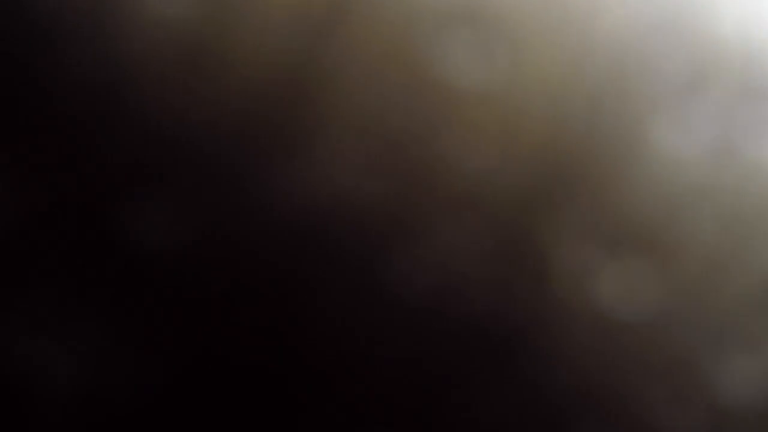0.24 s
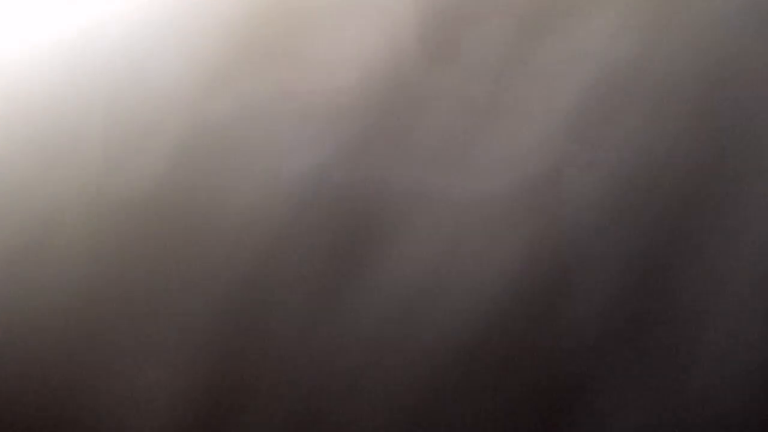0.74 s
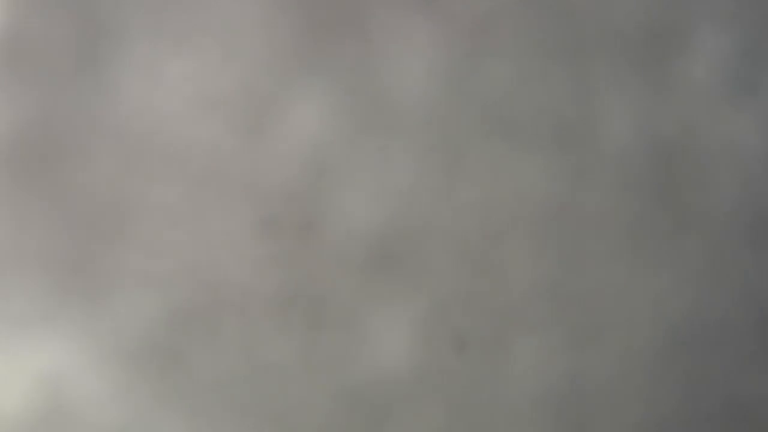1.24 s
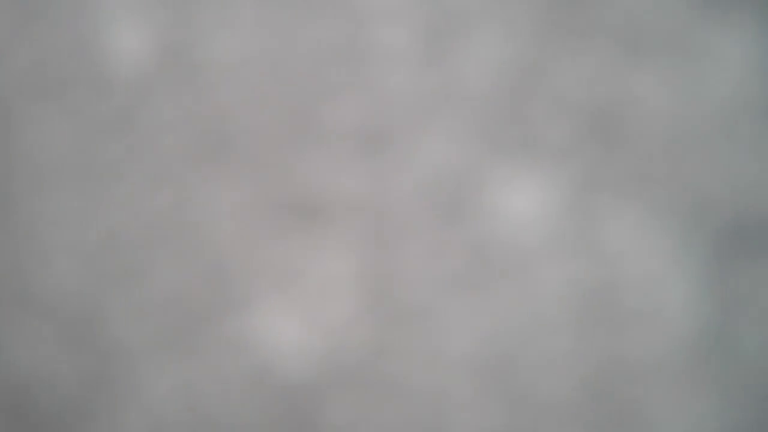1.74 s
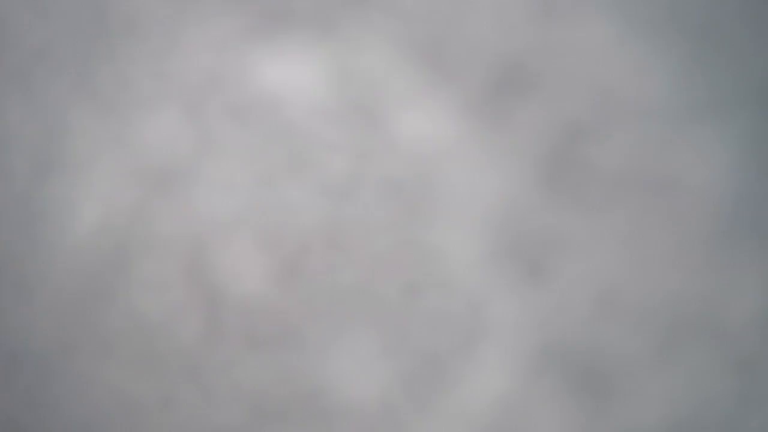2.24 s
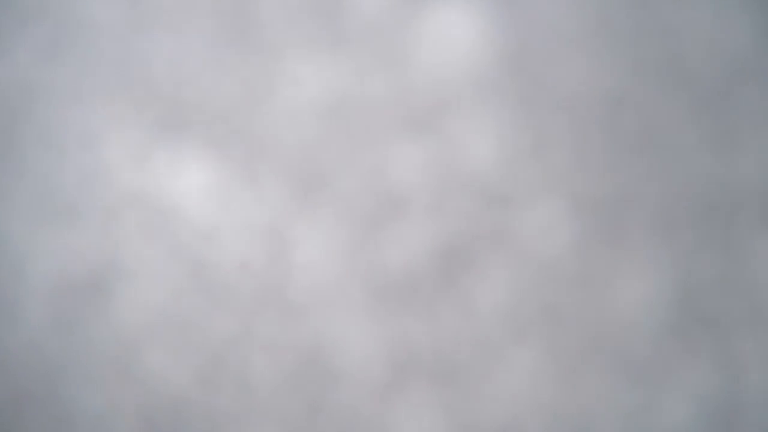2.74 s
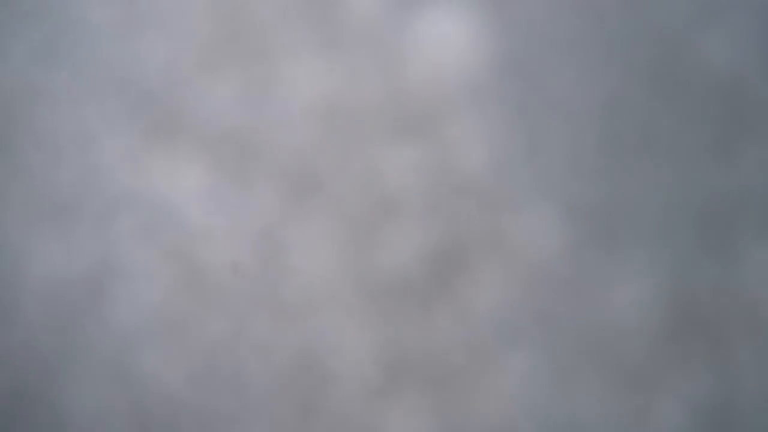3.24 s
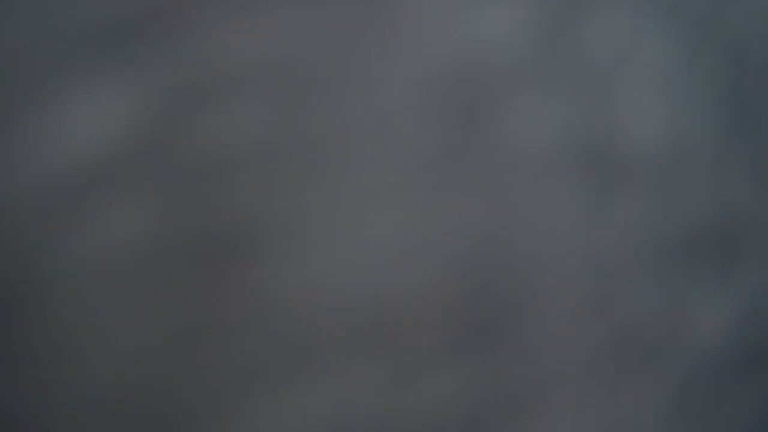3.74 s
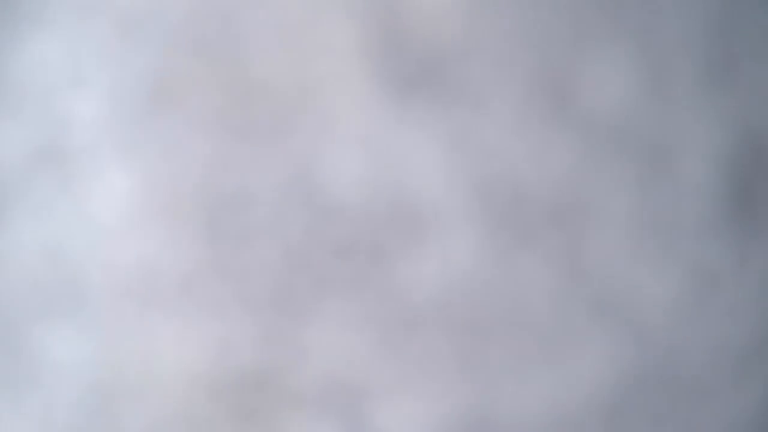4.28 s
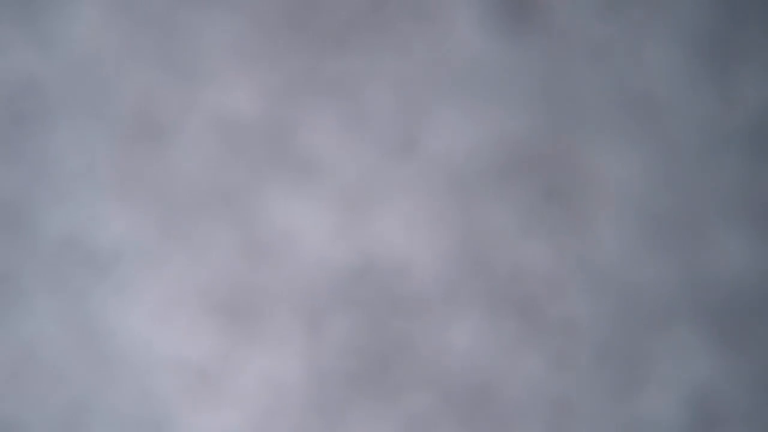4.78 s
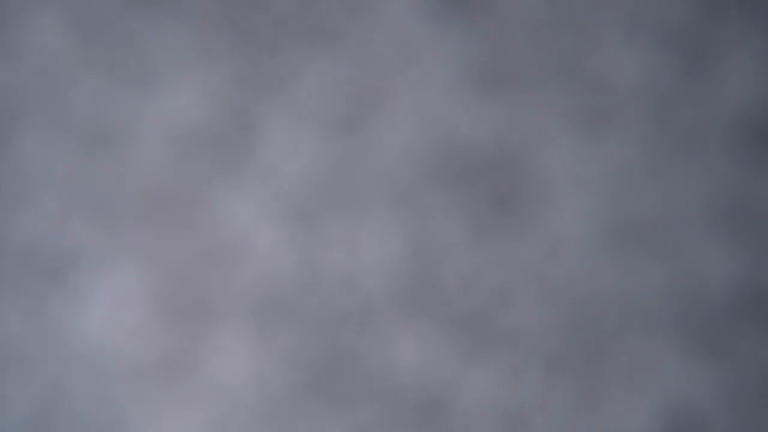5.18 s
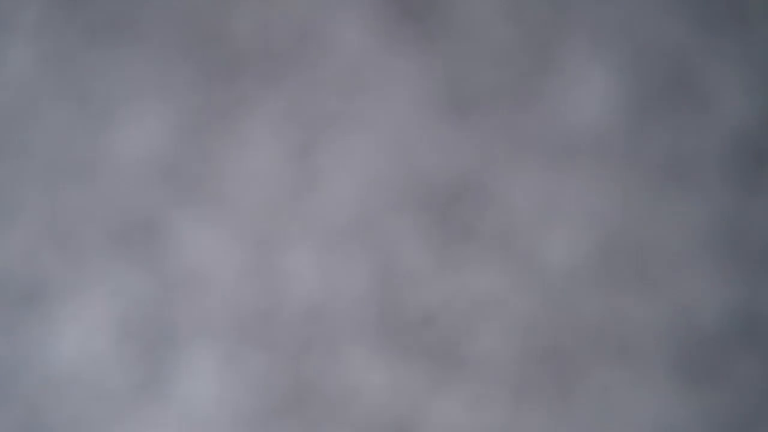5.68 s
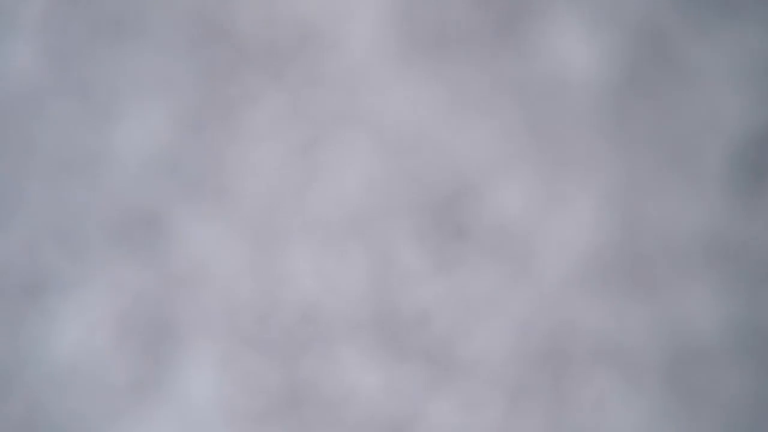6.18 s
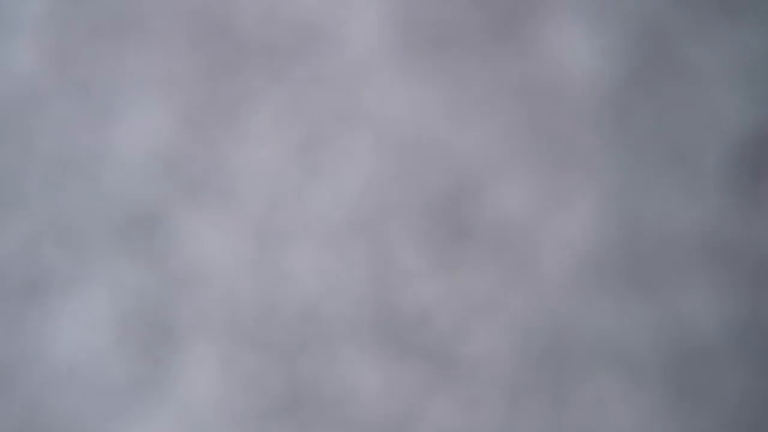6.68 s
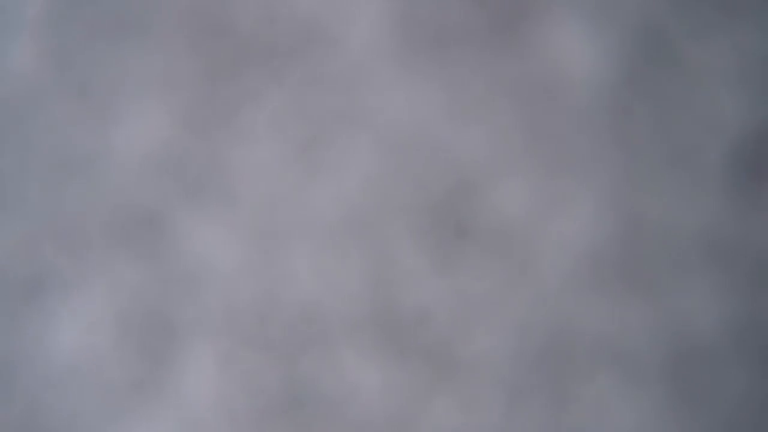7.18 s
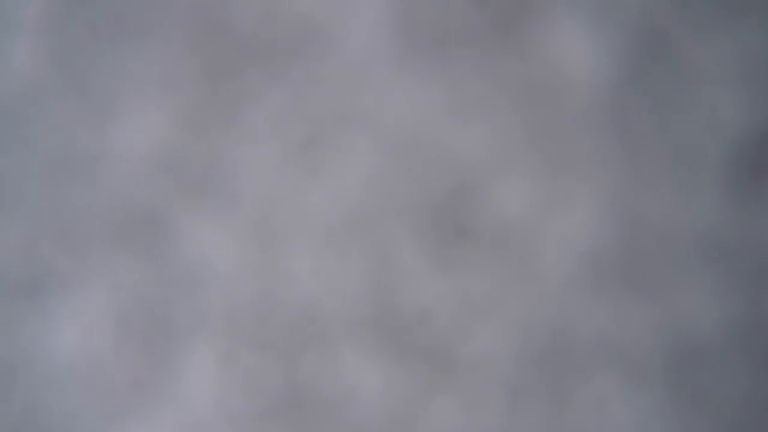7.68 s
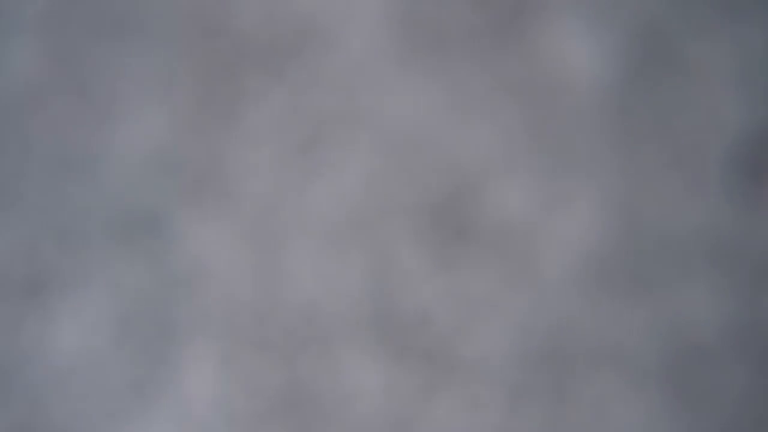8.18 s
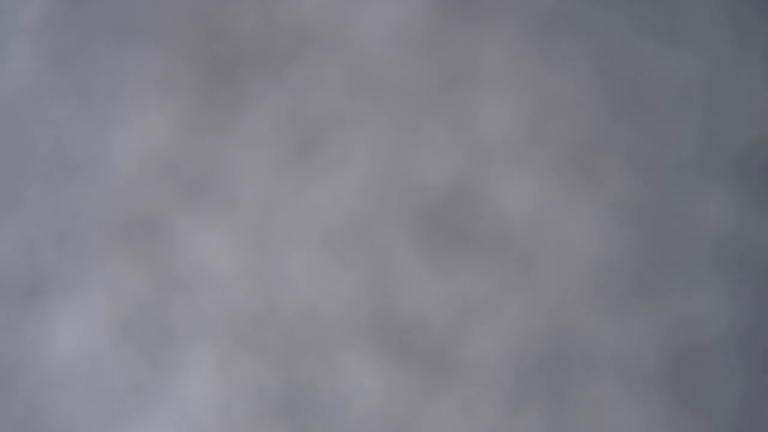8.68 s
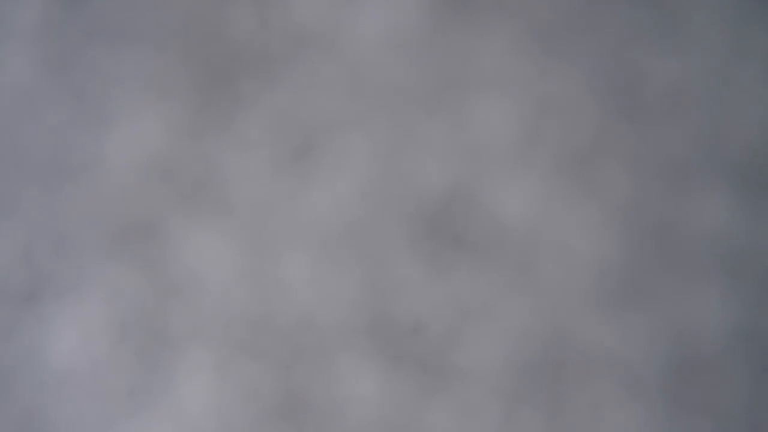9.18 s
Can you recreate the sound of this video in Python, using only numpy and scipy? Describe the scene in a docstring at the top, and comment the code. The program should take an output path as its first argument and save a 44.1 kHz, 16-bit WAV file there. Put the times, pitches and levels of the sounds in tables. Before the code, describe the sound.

Close, harsh rustling of an animal's coat against a camera case, bursts of crackle and muffled bumps, hard knocks mid-way, quieter toward the end.

```python
"""Fur rubbing on a small camera

An animal's fur rests on a small outdoor camera, right on its microphone port, and rubs over it
stroke by stroke. Countless hairs flick the housing, as random clicks and noise that merge into a hiss.
The pushing body pumps air into the port and bumps the case: slow filtered noise and damped swings.
Stiff hairs and grit tick and something hard knocks, as short rings with bursts of noise.
A low hum, a gliding sine, passes once over a faint hiss, and the loudest moments overload the input."""
import sys
import numpy as np
from scipy.fft import rfft, irfft, next_fast_len
from scipy.io import wavfile
from scipy.ndimage import uniform_filter1d, map_coordinates

SR = 44100
rng = np.random.default_rng(int(sys.argv[2]) if len(sys.argv) > 2 else 0)


def waveform_to_disk(signal):
    """Save audio, clipped to [-1, 1], as 16-bit WAV at the path in sys.argv[1]."""
    frames = np.transpose(np.atleast_2d(signal))
    scaled = np.clip(frames, -1, 1) * 32767
    samples = np.round(scaled).astype(np.int16)
    wavfile.write(sys.argv[1], SR, samples)


N = 415422  # length in samples

# Colour of the faint steady hiss. Each row: frequency in Hz, relative level in dB per Hz.
HISS_COLOUR = [(30, 6.5), (150, 3), (600, 6), (2500, 2), (7000, -2), (15000, -7)]
# A low hum that sinks and fades. Each row: time in seconds, centre pitch in Hz, level in dB.
HUM_PATH = [(6.36, 102.9, -60), (6.42, 101, -35), (6.53, 96.5, -37.5), (6.62, 86.5, -34.5),
            (6.70, 86.3, -38), (6.76, 82, -70)]
# Ticks of stiff hairs and grit. Each row: start in seconds, level in dB, ring pitch in Hz,
# extra treble of the crack in dB.
HAIR_TICKS = [(.0973, -37, 4650, 16), (0.1573, -39, 4020, -5), (.285, -35, 3940, 9), (.3037, -39, 2610, 4),
              (0.322, -35, 2500, -2), (0.6741, -8.5, 2700, -1.5), (0.7105, -15.5, 2700, -10),
              (0.713, -13, 2770, -1), (1.0364, -20.5, 2870, 7.5), (1.8063, -18.5, 2790, 4),
              (2.4768, -14.5, 3980, -7), (2.72, -17.5, 2700, -5), (2.7436, -13.5, 2950, -11),
              (3.309, -19, 2800, 2.5), (4.2615, -30.5, 2970, 5), (4.2742, -17.5, 9900, -5),
              (4.3603, -14, 3000, 8), (4.6203, -15, 4200, 4), (4.9317, -9.5, 2500, -15.5),
              (5.343, -23, 3270, 8.5), (5.4545, -28, 3860, -10), (5.4797, -28.5, 2530, 8.5),
              (5.5207, -22, 4000, 2), (5.5747, -27, 4290, -1), (5.7348, -27, 2480, -17),
              (6.4265, -1, 4070, -6.5), (7.203, -30, 3250, -10), (7.578, -30, 3320, -5),
              (7.7175, -19.5, 3340, -8), (7.879, -22, 3650, 0), (7.912, -17, 3000, -7),
              (8.943, -26, 3000, -7), (9.117, -38, 3000, -2), (9.2447, -22.5, 4200, 3.5)]
# Colour of a snapping hair. Each row: frequency in Hz, relative level in dB per Hz.
SNAP_COLOUR = [(600, -23), (1800, -2), (3500, -1), (6000, -3), (11000, -9.5), (14500, -8), (16000, -36.5)]
# Hard knocks on the case. Each row: start in seconds, level in dB, main ring pitch in Hz,
# time to the peak of the swell in seconds, time for the scrape to fall 60 dB in seconds.
HARD_KNOCKS = [(0.8035, -7.5, 3080, 0.00077, 0.0067), (0.8948, -15, 1700, 0.00074, 0.011),
               (.9175, -8, 2550, 0.0014, 0.0091), (3.336, -5, 2350, 0.00025, 0.012),
               (4.1119, 0, 2250, 0.00051, 0.038), (4.119, -2.5, 2590, 0.0012, .02),
               (4.138, 0, 1910, 0.00063, 0.029), (4.143, -5, 2600, 0.00067, .02),
               (4.417, -19.5, 2320, 0.0014, 0.014), (4.507, -13.5, 1960, 0.00081, 0.043),
               (4.5448, -9.5, 2710, 0.0016, .001), (4.5518, 1, 1990, 0.00086, .003),
               (4.564, -5, 2190, 0.00087, 0.0009), (5.402, 3, 1840, 0.00076, 0.01),
               (5.4052, 0, 2550, 0.00025, 0.0082), (6.141, -9.5, 1750, 0.00057, 0.018),
               (8.3552, -2.5, 2830, .0008, 0.011)]
# Colour of a hard scrape. Each row: frequency in Hz, relative level in dB per Hz.
SCRAPE_COLOUR = [(300, -7), (1400, -2), (2500, -1), (4200, 2), (7000, -14.5), (15000, -19.5)]
# Soft bumps of the body. Each row: start in seconds, level in dB, starting pitch in Hz,
# time to fall 60 dB in seconds.
BODY_BUMPS = [(0.37, -6, 31, 0.48), (0.47, -8, 31.2, 0.24), (.835, -0.5, 37, 0.19), (.863, -2, 35.6, 0.31),
              (1.457, -11, 35.5, 0.27), (1.623, -10.5, 60.4, 0.078), (2.392, -27, 50, 0.032),
              (3.341, -6, 56, 0.17), (3.829, -2, 83.5, 0.064), (3.886, 3.5, 29.7, 0.058),
              (4.098, 1.5, 105, 0.096), (4.134, 1.5, 27.2, 0.14), (4.175, -7, 29.8, 0.14),
              (4.69, -7.5, 24.9, 0.12), (4.93, -4, 72.4, 0.13), (5.352, 5, 91, 0.047),
              (5.364, 0.5, 24.5, 0.21), (6.141, 6.5, 62, 0.022), (6.353, -10, 188, 0.024),
              (8.358, -2.5, 37.6, 0.26)]
# Slow drift of air at the port. Each row: time in seconds, level in dB.
AIR_DRIFT = [(0.0, -41.5), (0.73, -25), (1.15, -37), (2.39, -30), (2.54, -33), (3.17, -34.5), (4.01, -22),
             (4.22, -34.5), (4.83, -27.5), (5.85, -64), (6.22, -34), (7.11, -59), (8.08, -46), (8.37, -28),
             (9.1, -53), (9.42, -46)]
# Colour of the slow sway of pressure. Each row: frequency in Hz, relative level in dB per Hz.
SWAY_COLOUR = [(8, -14), (18, 6.5), (28, 4), (45, -3.5), (70, -12.5), (120, -42), (300, -85)]
# Colour of the dragging shudder. Each row: frequency in Hz, relative level in dB per Hz.
SHUDDER_COLOUR = [(30, -18), (60, 1), (90, -4), (130, -9), (200, -14), (300, -23.5), (500, -33),
                  (1200, -52)]
# The coat resting on the case between strokes. Each row: time in seconds, rub in dB,
# bristle fizz in dB relative to the rub, weight on the case in dB. Shared trims follow in the code.
RESTING_COAT = [(0.0, -54.0, -13.0, -60), (0.2, -60.5, -12.5, -52), (0.5, -49.5, -25, -36),
                (1.25, -42.5, -6.5, -44), (1.82, -42.5, -1.5, -49.5), (2.7, -51.5, -1.5, -46),
                (3.2, -53.5, 1, -63), (3.6, -36.5, -7.0, -33), (4.2, -49.5, -7, -56),
                (4.75, -51.5, -8.0, -55), (5.22, -57.0, -6, -61), (5.47, -52.5, -7, -73.0),
                (5.6, -59, -4.0, -51.5), (6.55, -44, -11, -47), (7.15, -60, -8.5, -55.5),
                (8.05, -53.5, -4, -68), (8.75, -50.5, 1, -60.0), (9.0, -57.0, -5.0, -61),
                (9.25, -55.5, -2.5, -69), (9.42, -63, -4, -56)]
# Strokes of the fur. Each row: time of reaching full speed, rise, hold and fall in seconds, rub in dB,
# then soft underfur, stiff hair tips and bristle fizz in dB relative to the rub,
# and weight on the case in dB. Shared trims follow in the code.
FUR_STROKES = [(0.396, 0.051, 0.0081, 0.032, -36, -3, -14, -31, -31),
               (0.625, 0.1, 0.012, 0.06, -29.5, -1.5, 3.5, -12, -30.5),
               (0.807, 0.077, 0.0083, 0.04, -17.5, 2.5, 9.5, -9, -19),
               (0.833, 0.044, 0.05, 0.013, -18.5, 8, 9.5, -8.5, -22),
               (0.92, 0.003, 0.014, 0.049, -15, -12, 5, -5, -30),
               (1.01, 0.087, 0.0038, 0.277, -24.5, 3, 2, -15.5, -35.5),
               (1.487, 0.2, 0.0089, 0.023, -25.5, 1.5, 1.5, -14.0, -30),
               (1.575, 0.11, 0.067, 0.094, -22, 2.5, 0.5, -15.0, -26.5),
               (1.965, 0.08, 0.17, 0.011, -34.5, 0.5, 4.5, -8.0, -42),
               (2.2, 0.086, 0.0061, 0.03, -14.5, 1.5, -7, -15.5, -29.5),
               (2.298, 0.18, 0.014, 0.022, -16.5, 2, 1.5, -12.5, -21.5),
               (2.386, 0.042, 0.04, 0.04, -19.5, 2.5, 0.0, -12, -23),
               (2.522, 0.185, 0.0056, 0.112, -24.5, 0, 0.5, -13.0, -33),
               (2.638, 0.16, 0.009, 0.027, -24.5, -0.5, -2.5, -10.5, -39),
               (2.747, 0.043, 0.036, 0.061, -30, -0.5, 1, -11.5, -37.5),
               (2.92, 0.071, 0.069, 0.026, -24.5, 1.5, -1, -10.5, -34),
               (3.079, 0.16, 0.066, 0.116, -31.5, -2.0, 0.5, -7, -40),
               (3.339, 0.013, 0.0081, 0.024, -11, -2, -4, -11, -20),
               (3.364, 0.07, 0.031, 0.039, -20.5, -0.5, -1.5, -13.5, -30),
               (3.532, 0.029, 0.1, 0.023, -27.5, 3, 1, -10, -27),
               (3.681, 0.05, 0.085, 0.043, -17.5, 0.5, -2, -13, -21.5),
               (3.779, 0.058, 0.092, 0.068, -14, 1.5, -0.5, -12.5, -24.5),
               (3.923, 0.025, 0.0087, 0.03, -16, 3.5, 1, -5.5, -21),
               (3.949, 0.057, 0.069, 0.056, -15.5, 0.5, -1.0, -15.5, -20),
               (4.059, 0.043, 0.06, 0.065, -17.0, 1, 2.5, -8.5, -21),
               (4.268, 0.034, 0.02, 0.06, -49, -1, 8, 3, -57),
               (4.376, 0.1, 0.0072, 0.03, -42.5, -2, 4, -17, -52),
               (4.418, 0.056, 0.0065, 0.012, -25.5, 2, -1, -16.5, -23),
               (4.46, 0.038, 0.056, 0.08, -29.5, 1, 1, -12.5, -33.0),
               (4.639, 0.054, 0.024, 0.04, -32, 3, 2, -7.5, -33.5),
               (4.808, 0.028, 0.0043, 0.069, -34, 5.5, 3.5, -11.5, -22.5),
               (4.936, 0.016, 0.0088, 0.029, -33, 11, 5, -14, -15.5),
               (5.08, 0.019, 0.044, 0.02, -40.5, 8.5, 1, -13.5, -28.5),
               (5.292, 0.041, 0.053, 0.06, -45.0, 9, 0, -18, -43.5),
               (5.363, 0.016, 0.0056, 0.054, -20, 9, -1.5, -9.5, -15),
               (5.405, 0.01, 0.006, 0.022, -21, -7.0, -3, -3.5, -21.0),
               (5.68, 0.051, 0.005, 0.03, -50.5, -2, 6, -6, -57),
               (5.888, 0.117, 0.006, 0.065, -32.5, -1, 0, -12, -39.5),
               (6.04, 0.066, 0.056, 0.02, -39.5, -1, -0.5, -13.5, -43.5),
               (6.128, 0.063, 0.019, 0.012, -23.5, -2, -1.5, -14, -31),
               (6.184, 0.03, 0.024, 0.079, -20.5, -4, 0.5, -14.0, -29.5),
               (6.365, 0.11, 0.047, 0.153, -29, 4.5, 1, -14, -31.5),
               (6.767, 0.085, 0.0065, 0.035, -32.5, 3.5, 1.5, -9, -37.5),
               (6.873, 0.058, 0.012, 0.029, -41.5, -2.0, -1, -9.5, -43),
               (7.096, 0.24, 0.0066, 0.036, -41, -0.5, -3, -9, -42.5),
               (7.203, 0.0041, 0.095, 0.057, -50.5, 1, -1.5, -5.5, -57),
               (7.396, 0.035, 0.128, 0.013, -49.0, 1, 2, -7.5, -49.5),
               (7.613, 0.018, 0.063, 0.044, -47.5, -4, -4, -12.0, -50.0),
               (7.699, 0.1, 0.019, 0.038, -39.0, 0, 1, -9.5, -39),
               (7.906, 0.2, 0.004, 0.102, -40.5, -1.5, -1, -9.0, -45),
               (8.227, 0.098, 0.048, 0.065, -18.0, -0.5, -2, -11.5, -27),
               (8.359, 0.022, 0.0057, 0.019, -13, 2, 0.5, -9, -14.5),
               (8.403, 0.033, 0.063, 0.038, -18, 1, 1, -7.5, -28.5),
               (8.61, 0.095, 0.037, 0.057, -25, -1.0, -0.5, -9.5, -32.5),
               (8.708, 0.22, 0.15, 0.131, -42.5, -0.5, 4.5, -6, -50),
               (8.839, 0.047, 0.0088, 0.026, -27, 2, 1, -9, -32)]
# Colour of hairs on the housing. Each row: frequency in Hz, relative level in dB per Hz.
HOUSING_COLOUR = [(100, -19.5), (250, -5), (400, -9), (550, -10.5), (800, -10.5), (1050, -7.5), (1350, -2),
                  (1900, 0), (2800, 2.5), (3400, -6), (4400, -8), (5400, -12), (6500, -17.5), (9000, -38)]
# Colour of the bristle fizz. Each row: frequency in Hz, relative level in dB per Hz.
FIZZ_COLOUR = [(3000, -50), (5000, -4), (6500, -0.5), (8000, 0), (9500, -1.5), (12000, -3), (15500, -7.5)]
# Narrow resonances of the case. Each row: frequency in Hz, width in Hz, level in dB.
CASE_MODES = [(1800, 180, -10.5), (2500, 120, -43), (3270, 300, -43), (3810, 650, -1.5), (5500, 300, -14),
              (9400, 500, -13)]
# How freely the port sings when hair tips skim its rim. Each row: time in seconds,
# level in dB before a shared trim.
RIM_SKIM = [(0, -23), (.7, -9), (.84, -12), (1.0, -16), (2.2, -2), (3.7, -17), (5.8, -27), (6.5, -3),
            (6.9, 7), (7.9, 0), (8.3, 2), (9.42, -3)]
# Resonances of the port's rim. Each row: frequency in Hz, width in Hz, level in dB before that trim.
RIM_MODES = [(3330, 250, 2.5), (5190, 240, -1.5), (13400, 670, -5)]

# A stroke drops this far over its rise or fall time, with rounded shoulders.
EDGE_DB, EDGE_CURVE = 20, 1.264
# Underfur and hair tips of the resting coat, in dB relative to its rub.
REST_UNDERFUR_DB, REST_TIPS_DB = 2, 2
# Slow sway relative to the weight, the time over which it follows, and the dragging shudder.
SWAY_DB, SWAY_LAG_S, SHUDDER_DB = 2.5, 0.01, 0
TREBLE_HZ = 6500  # above this the finest hairs add their own crack
TOP_HZ = 15400  # band limit of the input


def amp(db):
    """Turn decibels into gain."""
    return 10 ** (np.asarray(db) / 20)


def decibels(gain):
    """Turn gain into decibels."""
    return 20 * np.log10(gain)


def unit(x):
    """Scale x to an average (rms) strength of 1."""
    return x / np.sqrt(np.mean(x ** 2) + 1e-20)


def curves(rows):
    """Draw lines between the rows: one value per sample for each column after the time."""
    s, *columns = np.transpose(rows)
    order = np.argsort(s, kind="stable")
    t = np.arange(N) / SR
    return [np.interp(t, s[order], column[order]) for column in columns]


def wobble(rate):
    """Make a smooth random curve through rate random points a second."""
    points = rng.standard_normal(int(N * rate / SR) + 4)
    return unit(map_coordinates(points, [np.arange(N) * rate / SR]))


def filtered(x, response):
    """Multiply the spectrum of x by a response that depends on frequency."""
    m = next_fast_len(N + SR // 2)  # spare room for ringing past the end
    return irfft(rfft(x, m) * response(np.fft.rfftfreq(m, 1 / SR)), m)[:N]


def lowpassed(x, edge_hz, order):
    """Fade out what lies above the edge, more steeply for a higher order."""
    return filtered(x, lambda hz: 1 / (1 + (hz / edge_hz) ** order))


def coloured(x, points):
    """Give x the colour of (Hz, dB) points, at rms 1."""
    f, db = np.transpose(points)
    return unit(filtered(x, lambda hz: amp(np.interp(np.log(hz + 1), np.log(f), db))))


def resonate(x, modes):
    """Let x drive a set of resonances and return only their ringing."""
    def response(f):
        return sum(amp(db) * 1j * f * width / (centre * centre - f * f + 1j * f * width)
                   for centre, width, db in modes)
    return filtered(x, response)


def add(track, s, sound):
    """Mix a sound into the track at time s."""
    part = track[max(round(s * SR), 0):][:len(sound)]
    part += sound[:len(part)]


def hiss():
    """A faint, steady random noise lies under everything."""
    return amp(-69.5) * coloured(rng.standard_normal(N), HISS_COLOUR)


def hum():
    """A soft low tone slides down under the rubbing; its pitch wavers a little."""
    hz, db = curves(HUM_PATH)
    turns = np.cumsum(hz * (1 + 0.011 * wobble(25))) / SR
    return amp(db) * np.sin(2 * np.pi * turns)


def ticks():
    """A stiff hair or a grain of grit snaps on the case: a bright crack with a very short ring."""
    out, t = np.zeros(N), np.arange(SR // 30) / SR
    snap = coloured(rng.standard_normal(N), SNAP_COLOUR)
    low = lowpassed(snap, TREBLE_HZ, 8)
    high = snap - low
    for s, db, hz, treble_db in HAIR_TICKS:
        now = slice(round(s * SR), round(s * SR) + len(t))
        ring = 0.74 * amp(-60 * t / 0.0059) * np.sin(2 * np.pi * hz * t)
        crack = 0.43 * amp(-60 * t / 0.0072) * (low[now] + amp(treble_db) * high[now])
        onset = 1 - np.exp(-t / 0.00017)
        add(out, s, amp(db) * onset * (ring + crack))
    return out


def knocks():
    """A hard contact scrapes briefly while the port cavity swells and rings for a few cycles."""
    out, t = np.zeros(N), np.arange(SR // 20) / SR
    grit = coloured(rng.standard_normal(N), SCRAPE_COLOUR)
    for s, db, hz, rise, t60 in HARD_KNOCKS:
        swell = (t / rise * np.exp(1 - t / rise)) ** 2
        overtone = np.sin(2 * np.pi * hz * 1.53 * t + rng.uniform(0, 2 * np.pi))
        ring = np.sin(2 * np.pi * hz * t) + 0.29 * overtone
        scrape = 0.44 * amp(-60 * t / t60) * grit[round(s * SR):][:len(t)]
        add(out, s, amp(db) * (swell * ring + scrape))
    return out


def bumps():
    """Each bump is a heavily damped swing of pressure that slows as the fur gives way."""
    out, t = np.zeros(N), np.arange(SR // 3) / SR
    for s, db, hz, t60 in BODY_BUMPS:
        turns = hz * t * (1 - 0.1 * (1 - np.exp(-t / 0.018)))
        onset = 1 - np.exp(-t / 0.0011)
        add(out, s, amp(db - 60 * t / t60) * onset * np.sin(2 * np.pi * turns))
    return out


def flicks(rate, spread_db):
    """Hairs slip off an edge: random clicks of uneven size, rate a second, at steady power."""
    chance = np.clip(rate / SR, 1e-4, 1)
    sizes = rng.choice([-1, 1], N) * amp(spread_db * rng.standard_normal(N))
    return unit((rng.random(N) < chance) * sizes / np.sqrt(chance))


def pressure(weight):
    """The leaning body pumps air into the port and drags the case in small jerks."""
    drift_db, = curves(AIR_DRIFT)
    lean = filtered(weight, lambda hz: 1 / (1 + 2j * np.pi * hz * SWAY_LAG_S))
    sway = coloured(rng.standard_normal(N), SWAY_COLOUR)
    # dividing by the recent strength makes the pushes more even
    strength = np.sqrt(np.abs(uniform_filter1d(sway ** 2, size=4000)) + 0.13)
    sway = unit(sway / strength)
    shudder = coloured(flicks(900, spread_db=6.5), SHUDDER_COLOUR)
    sway_gain = np.hypot(amp(SWAY_DB) * lean, amp(drift_db))
    return sway_gain * sway + amp(SHUDDER_DB) * weight * shudder


def contact():
    """Each stroke rises, holds and falls, adding its power to that of the resting coat."""
    t = np.arange(N) / SR
    rub_db, fizz_db, weight_db = curves(RESTING_COAT)
    # gains in order: rub, underfur, hair tips, fizz, weight
    power = amp([rub_db, rub_db + REST_UNDERFUR_DB, rub_db + REST_TIPS_DB,
                 rub_db + fizz_db, weight_db]) ** 2
    for s, rise, hold, fall, db, underfur, tips, fizz, weight in FUR_STROKES:
        near = slice(*np.searchsorted(t, [s - 3 * rise, s + hold + 3 * fall]))
        before = (s - t[near]) / rise
        after = (t[near] - s - hold) / fall
        away = np.maximum(np.maximum(before, after), 0)
        shape = amp(-EDGE_DB * away ** EDGE_CURVE)
        peaks = amp([db, db + underfur, db + tips, db + fizz, weight])
        power[:, near] += np.outer(peaks, shape) ** 2
    return np.sqrt(power)


def through_case(x):
    """The case passes everything and rings a little at its resonances."""
    return x + resonate(x, CASE_MODES)


def fur(rub_db, underfur_db, tips_db, fizz_db):
    """A faster stroke flicks more hairs, so sparse crackle merges into a loud hiss."""
    skim_db, = curves(RIM_SKIM)
    speed = amp(.5 * (rub_db + 25))  # a louder rub counts as a faster one
    crackle = flicks(8000 * speed, spread_db=5.0)
    smooth = 0.77 * rng.standard_normal(N)
    sparse = 0.099 * flicks(90, spread_db=0.0)
    hairs = through_case(crackle + smooth + sparse)
    tufts = amp(rub_db + 0.86 * wobble(45) + 0.96 * wobble(260))  # hairs come in tufts

    # split the rub into bands from dull to sharp
    body = coloured(hairs, HOUSING_COLOUR)
    dull = lowpassed(body, 1250, 6)
    sharp = body - lowpassed(body, 3700, 8)
    middle = body - dull - sharp
    lower = lowpassed(middle, 2300, 8)
    upper = middle - lower

    # soft and stiff hairs touch by turns, so the colour keeps shifting
    shift = 1.23 * wobble(35)
    rub = amp(underfur_db + wobble(60)) * dull
    rub += amp(shift) * lower + amp(-shift) * upper
    rub += amp(tips_db + 0.88 * wobble(80)) * sharp
    rub = amp(-1.48) * rub + amp(fizz_db - 3.46) * coloured(hairs, FIZZ_COLOUR)
    singing = 0.63 * amp(skim_db) * resonate(rub, RIM_MODES)
    return tufts * (rub + singing)


def scene():
    """Everything happens at the port, over a faint steady hiss; the pushes lose their slowest swings."""
    rub, underfur, tips, fizz, weight = contact()
    background = hiss() + hum()
    contacts = knocks() + ticks()
    pushes = filtered(pressure(weight) + bumps(), lambda hz: 1j * hz / (7 + 1j * hz))  # fade out what lies below 7 Hz
    coat = fur(decibels(rub), decibels(underfur / rub), decibels(tips / rub), decibels(fizz / rub))
    return (background + contacts + pushes + coat)[None]


def record(dry):
    """The input saturates near full scale and keeps nothing above its band limit."""
    clipped = dry / (1 + np.abs(dry) ** 8) ** (1 / 8)
    return filtered(clipped[0], lambda hz: hz < TOP_HZ)[None]


dry = scene()
out = record(dry)
waveform_to_disk(out)
```